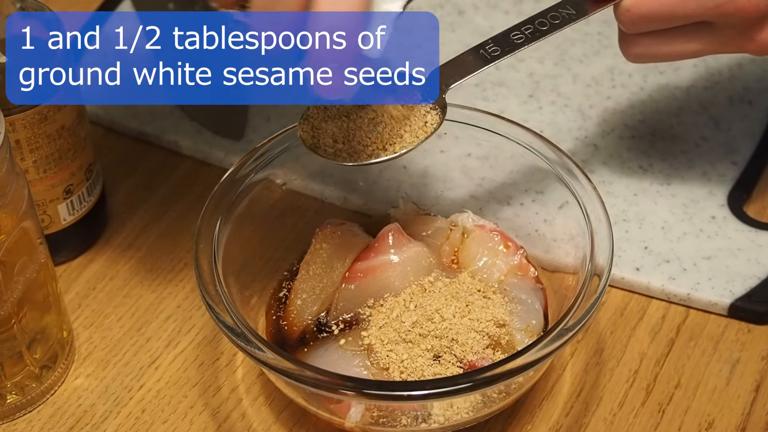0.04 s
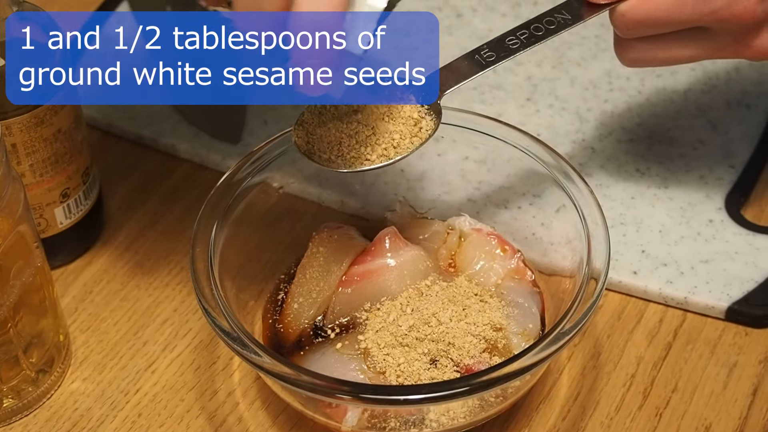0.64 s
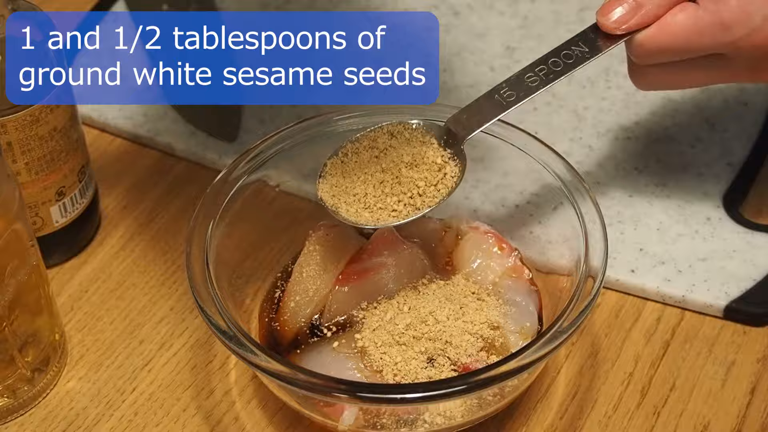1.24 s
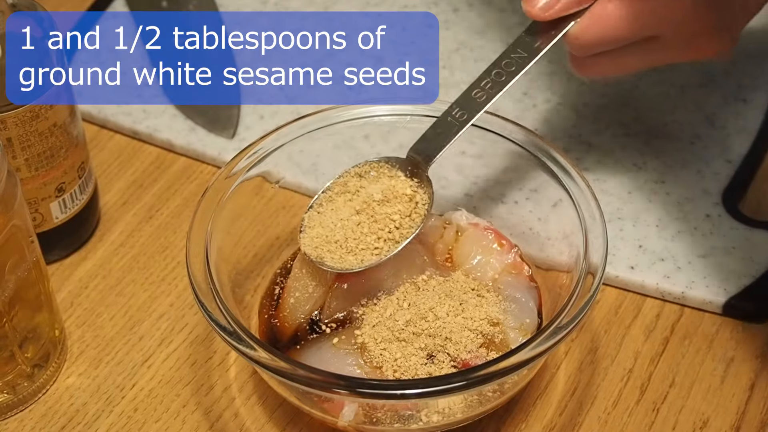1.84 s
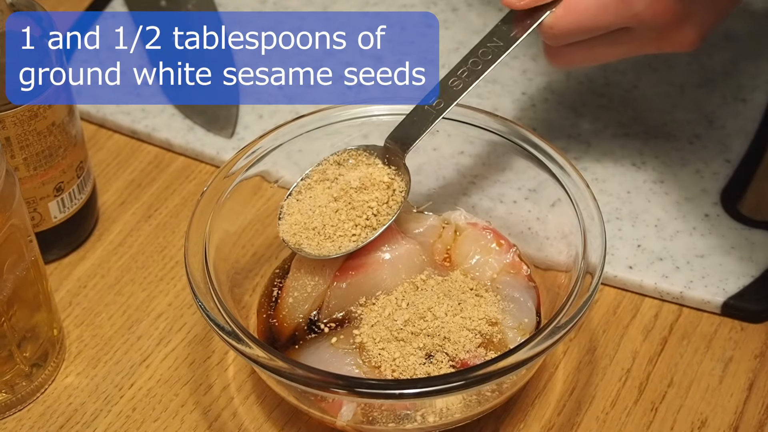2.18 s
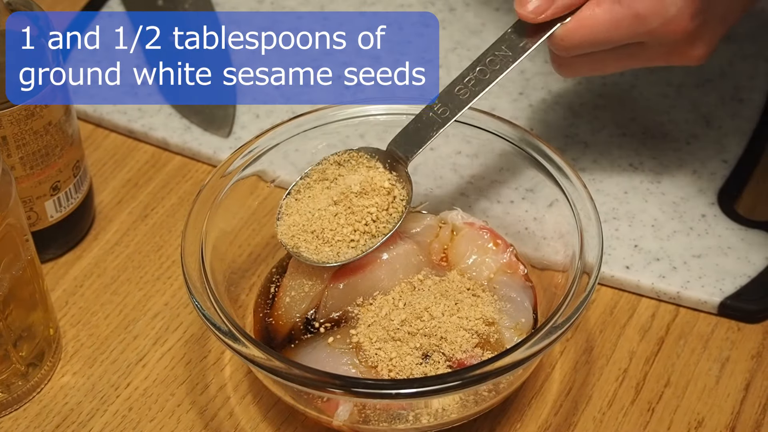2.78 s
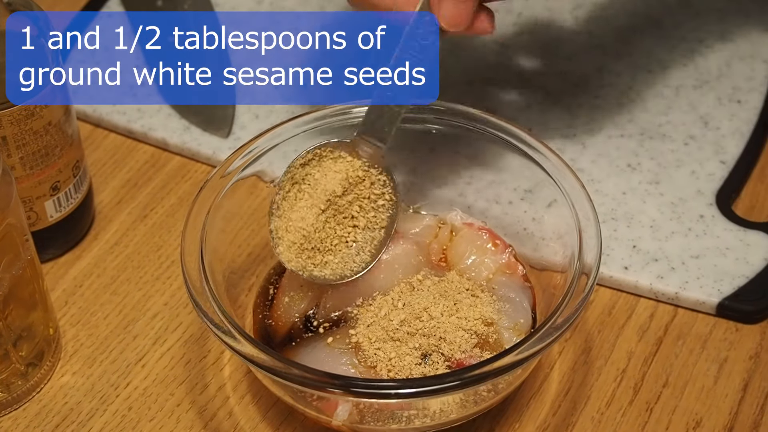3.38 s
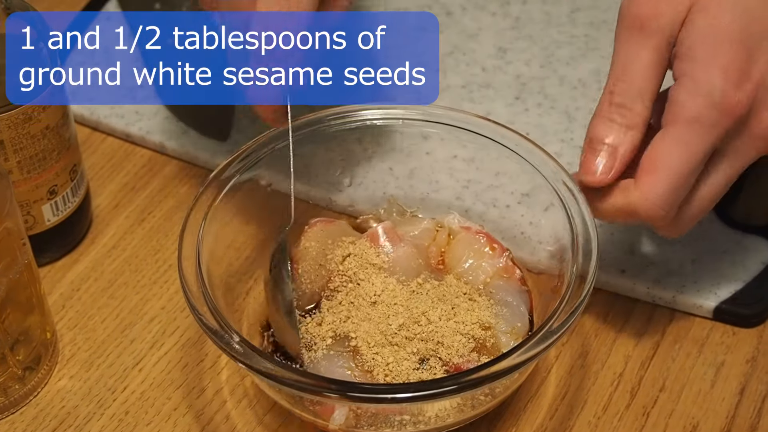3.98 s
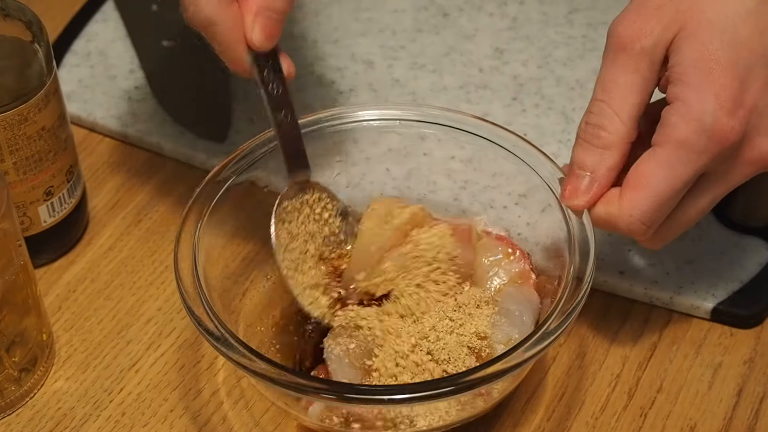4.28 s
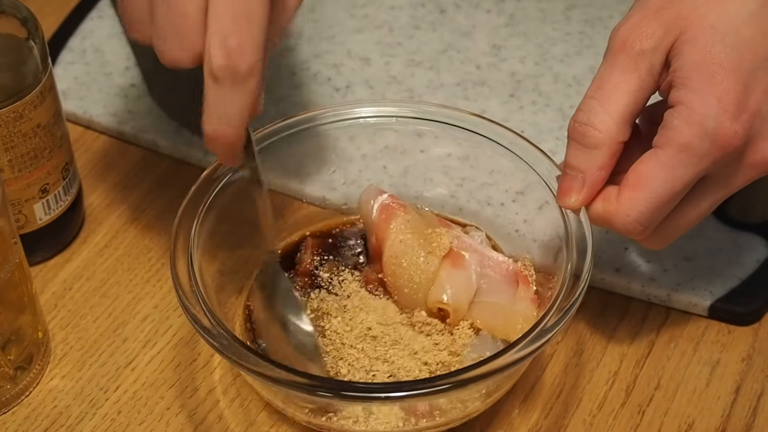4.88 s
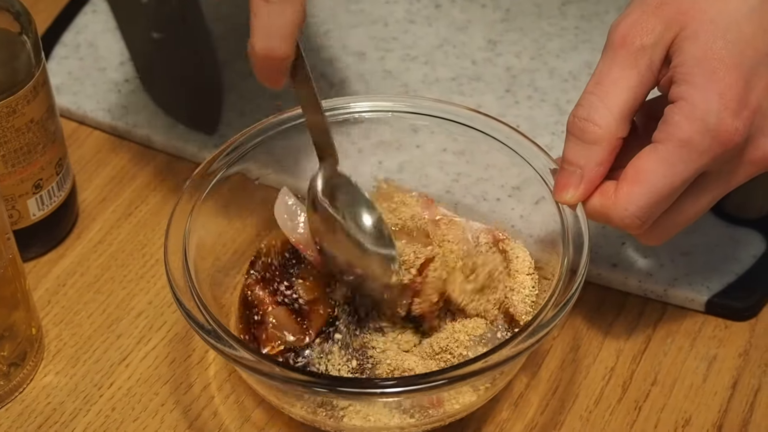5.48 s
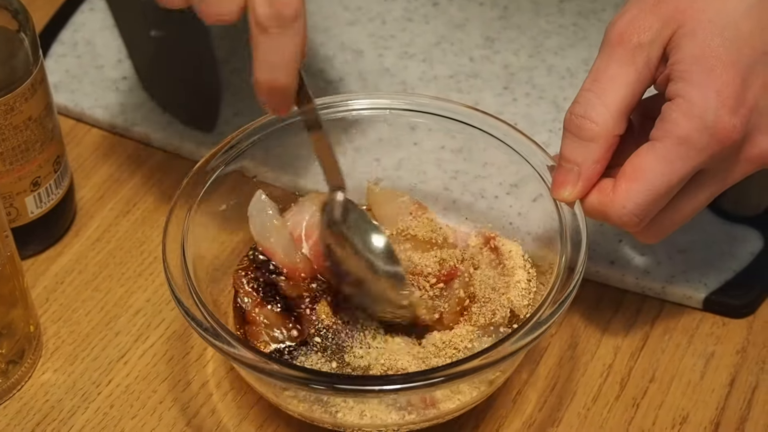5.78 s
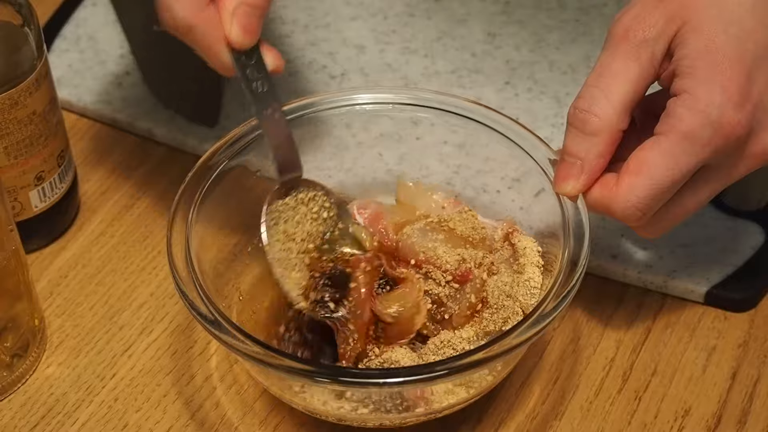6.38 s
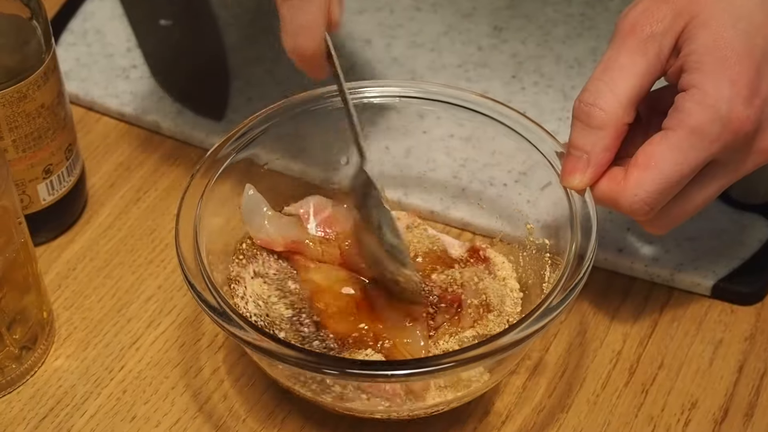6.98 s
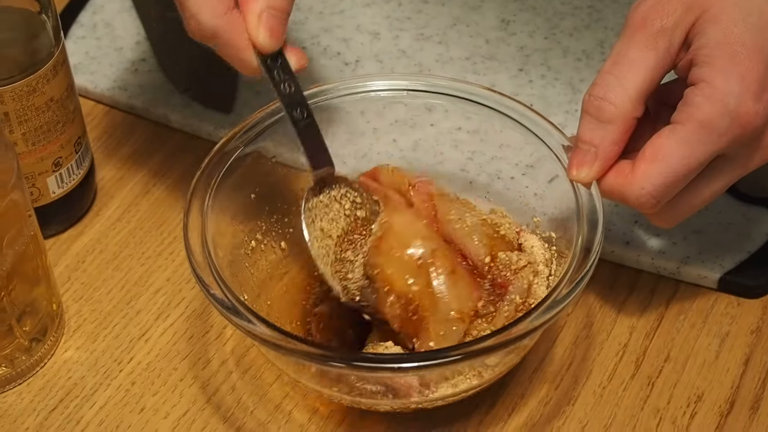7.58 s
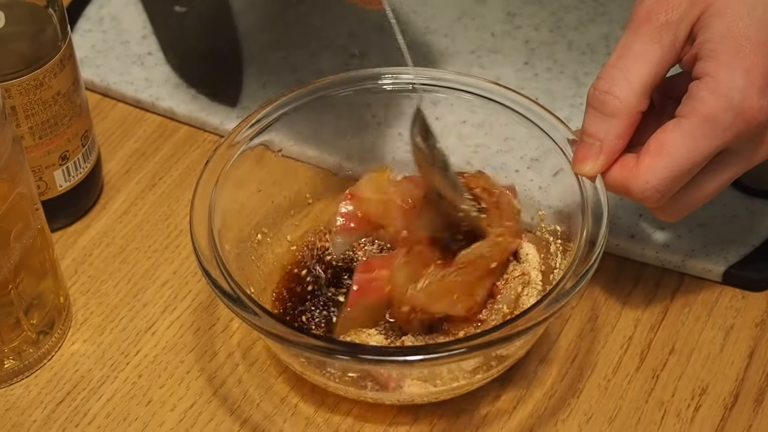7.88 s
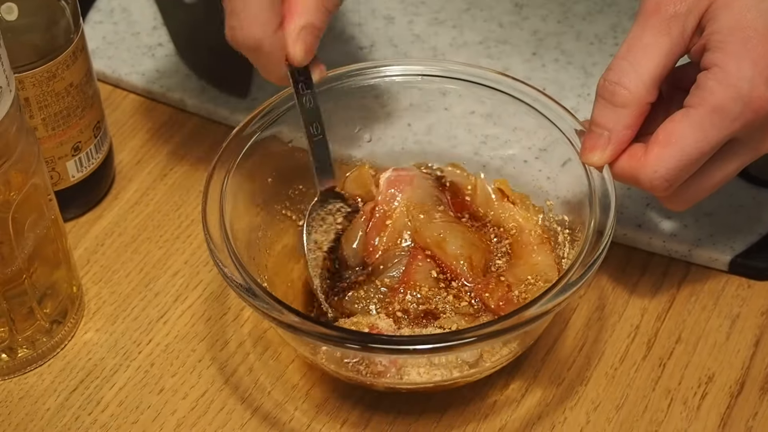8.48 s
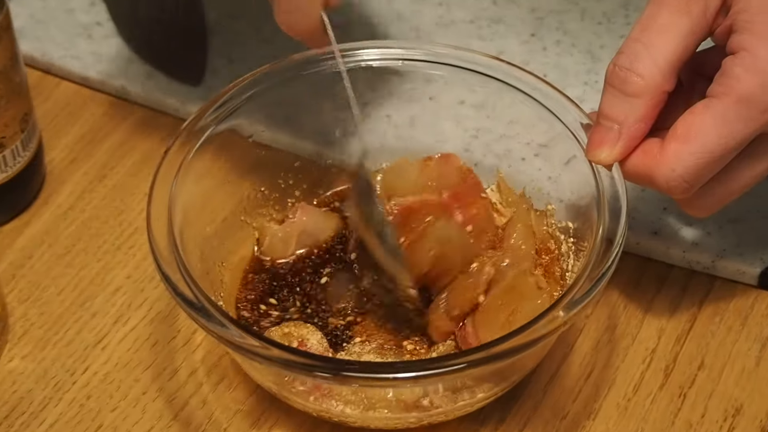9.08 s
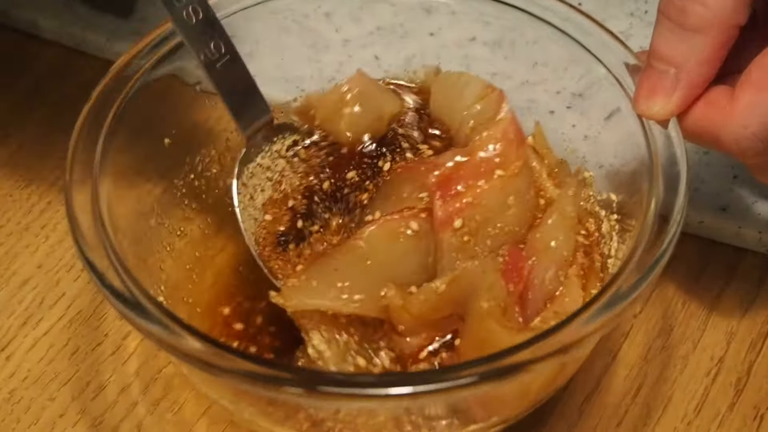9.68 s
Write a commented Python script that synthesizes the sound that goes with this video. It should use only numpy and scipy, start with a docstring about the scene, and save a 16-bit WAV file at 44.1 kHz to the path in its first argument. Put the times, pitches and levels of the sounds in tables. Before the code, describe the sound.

After a soft pour of seeds and a plastic rustle, a metal spoon stirs squelching meat, clinking on a glass bowl about once a second.

```python
"""A steel spoon clinks against a glass bowl about once a second as it stirs chicken in a wet marinade.
Each blow rings the glass and thumps the wooden counter; the meat squelches and tiny bubbles pop.
Before the stirring, ground sesame slides from a plastic packet onto the spoon, and the packet
crinkles and is put down to the right. A small kitchen hums quietly around it all."""
import sys
import numpy as np
from scipy import signal
from scipy.fft import rfft, irfft
from scipy.io import wavfile
from scipy.ndimage import uniform_filter1d

SR = 44100
rng = np.random.default_rng(int(sys.argv[2]) if len(sys.argv) > 2 else 0)


def wav_record(signal):
    """Record a signal, one row per channel, as 16-bit PCM in the file named by sys.argv[1]."""
    frames = np.transpose(np.atleast_2d(signal))
    bounded = np.clip(frames, -1, 1)
    # unit amplitude maps onto the largest positive 16-bit level
    quanta = np.round(bounded * 32767).astype(np.int16)
    wavfile.write(sys.argv[1], SR, quanta)


N = 429534
CUTOFF_HZ = 15800

# The spoon hits the bowl; a harder contact tilts the sound towards the treble. Each row: start in
# seconds, spot hit, ring level in dB, ring tilt in dB per octave, clack level in dB, clack tilt in dB
# per octave, thud level in dB. Levels in all tables are relative.
BLOWS = [(2.0606, "rim", -29.5, 2.5, -29, 5, -64), (2.0727, "rim", -37, 0.5, -42, 2, -54),
         (2.0825, "rim", -45, -4.5, -38, 5, -54), (3.8808, "wall", -16.5, -2, -15, 2.3, -52),
         (4.6187, "wall", -65.5, 4, -69, 19, -67), (4.8603, "wall", -65, 15, -70, 19, -51.5),
         (4.9319, "bottom", -36.5, 1.5, -25.5, 8, -51.5), (6.0032, "wall", -16, 1, -10.5, -0.5, -51),
         (7.1954, "wall", -17, -0.3, -12.5, -0.5, -62.5), (7.2784, "bottom", -40.5, 2.5, -26.5, 1.5, -54),
         (8.33, "wall", -15, 2, -12.5, -0.5, -57.5), (9.4359, "bottom", -54, -4, -23.5, 4.5, -49)]


def bowl_ring():
    """Each blow sets the glass bending and ringing, and thumps the counter twice through the bowl's foot."""
    # The glass, damped by the food: one list of close, beating tones for each way it bends.
    # Each row: pitch in Hz, level in dB, seconds to fade by 60 dB (called t60).
    bends = [
        [(1078, -12, .42), (1125, -1.5, .05), (1850, -2, .014)],
        [(2840, -15, .3), (2873, 2, .028)],
        [(5020, -7, .02), (5178, -3, .035), (5184, -23, .16), (5244, 3.5, .022), (5600, -2, .012)],
        [(7257, -16.5, .04), (8110, 1.5, .025), (8210, -17, .04)],
        [(11435, -1, .04), (12600, -7, .022), (12885, -8.5, .025)],
        [(15120, -2.5, .028)],
    ]
    # For each spot hit: how strongly it rings each of the six bends, in dB, lowest bend first.
    bend_db_at = {"rim": (1, -11.5, -5.5, -0.5, -18, -7), "wall": (-23, -14.5, 0, -1, -13, -24),
                  "bottom": (-11, 2, -7, -13, -13, -12)}
    # The counter's tones. Each row: pitch in Hz, level in dB, t60 in seconds.
    counter_tones = [(130, -3.5, 0.19), (180, 3, 0.076), (270, -3, 0.063), (480, -6.5, 0.059),
                     (813, -9, 0.064)]
    scatter_db = 1.5   # no two blows ring quite alike
    out = np.zeros((2, N))
    thud = struck(counter_tones, tilt_db=0, spread=.35)
    for start, spot, ring_db, tilt_db, _, _, thud_db in BLOWS:
        tones = [(hz, db + bend_db + scatter_db * rng.standard_normal(), t60)
                 for bend, bend_db in zip(bends, bend_db_at[spot]) for hz, db, t60 in bend]
        add(out, start, from_db(ring_db) * struck(tones, tilt_db, spread=.38))
        add(out, start, from_db(thud_db) * thud)
        add(out, start + 0.015, from_db(thud_db - 1.5) * thud)   # the bowl rocks back onto its foot
    return out * from_db([[.7], [-.7]])


def spoon_clack():
    """The held spoon gives a short clack; a gritty noise follows, lasting longer on rim and bottom hits."""
    # The steel, damped by the fingers. Each row: pitch in Hz, level in dB, t60 in seconds.
    steel_tones = [(1180, -13, 0.0072), (2223, -6.5, 0.0068), (2830, -7.5, 0.0015), (3590, -9.5, .008),
                   (4270, -6, .005), (5905, -1.5, 0.0026), (7315, -7, 0.0077), (8810, -5.5, 0.004),
                   (12300, -18.5, 0.0036), (13400, -13, 0.0072), (14200, -15, 0.0082)]
    # For each spot hit: the gritty noise's t60 in seconds.
    grit_t60_at = {"rim": 0.07, "wall": 0.01, "bottom": 0.079}
    # The gritty noise. Each row: frequency in Hz, level in dB.
    grit = [(200, -4.5), (1000, 4.0), (1600, -11), (3200, 3), (7000, -0.5), (10500, -10.5),
            (13500, -3.0), (16000, -8.5)]
    out = np.zeros((2, N))
    for start, spot, _, _, clack_db, tilt_db, _ in BLOWS:
        add(out, start, from_db(clack_db) * struck(steel_tones, tilt_db, spread=0.39))
        add(out, start, from_db(clack_db - 13) * burst(grit, grit_t60_at[spot]))
    return out


def pop(hz, cycles, rise, snap_db):
    """A wet film snaps and the small air pocket behind it rings, rising in pitch."""
    t = np.arange(SR // 30) / SR
    age = t * hz / cycles   # reaches 1 when the ring has faded by 60 dB
    tone = np.sin(2 * np.pi * hz * t * (1 + rise * np.minimum(age, 1)))
    loudness = from_db(-60 * age) * (1 - np.exp(-t * hz)) ** 3
    snap = rng.standard_normal(len(t)) * np.exp(-t / 0.00023)
    return tone * loudness + from_db(snap_db) * cut(snap, [min(.7 * hz, 10000), 1.4 * hz], "band")


def marinade():
    """A few clear smacks, each of two air pockets opening, over clusters of faint sticky crackles."""
    # The clearest bubbles. Each row: start in seconds, level in dB, pitch in Hz.
    bubbles = [(4.335, -42.5, 6950), (4.4169, -50, 2560), (4.4706, -33, 7630), (4.8908, -41, 7800),
               (5.5127, -43, 7000), (5.8002, -39, 6300), (6.346, -44.5, 6670), (6.3887, -48.5, 2260),
               (6.5075, -37, 4650), (6.521, -41.5, 7500), (6.8492, -40.5, 7500), (7.5442, -41.5, 13300),
               (7.6096, -40.5, 5850), (7.9333, -39, 3740), (7.9877, -42, 2420), (8.0162, -45.5, 3550),
               (8.7792, -49, 5460), (9.0153, -41, 7070), (9.212, -37.5, 3650), (9.2196, -38.5, 7000)]
    stir_start_s, stir_length_s, cluster_s = 4.0, 5.6, 0.078
    out = np.zeros(N)
    for start, db, hz in bubbles:
        add(out, start, from_db(db + 3) * pop(hz, cycles=24, rise=0.06, snap_db=-5))
        add(out, start + 0.0013, from_db(db - 9) * pop(0.55 * hz, cycles=13, rise=0.092, snap_db=-16))
    for when, pitch, size, *delays in rng.random((120, 6)):   # 120 clusters of three crackles
        start = stir_start_s + stir_length_s * when
        for delay in delays:
            hz = min(1800 * 7 ** pitch * (1 + 0.32 * delay), CUTOFF_HZ)
            db = -63.5 + 16.5 * size ** 2 - 8 * delay
            add(out, start + cluster_s * delay, from_db(db) * pop(hz, cycles=13, rise=.04, snap_db=-2.5))
    return place(out, pan_db=0.5, lag=0)


def squelch():
    """Countless tiny wet films tear while the meat is pushed round."""
    # The spoon's pushes. Each row: start in seconds, length in seconds, level in dB.
    pushes = [(4.25, 0.22, -88), (5.25, 0.26, -81.5), (6.35, 0.22, -85), (7.85, 0.23, -78.5),
              (8.75, 0.38, -73.5), (9.18, 0.48, -72.5)]
    # The wet noise. Each row: frequency in Hz, level in dB.
    wet_colour = [(700, -15.5), (2000, 2.5), (3700, -2.5), (7500, -1), (15000, -16.5)]
    tearing = colour(grainy(rng.standard_normal(N), rough_db=7), wet_colour)
    return place(strokes(pushes, swell=0.23, release_t60=0.26) * tearing, pan_db=1.5, lag=0)


def sesame_pour():
    """Ground seeds hiss out of the packet with every shake."""
    # The pour. Its one row: start in seconds, length in seconds, level in dB.
    pour = [(0.0, 0.71, -62.5)]
    # The sliding seeds. Each row: frequency in Hz, level in dB.
    seed_colour = [(880, -13), (1500, 1), (3030, -7), (3690, -1.5), (7460, -0.5), (10000, -5.5),
                   (13900, -5.5), (16000, -3)]
    first_shake_s, shake_period_s, shake_db = 0.14, 0.152, 2.5
    t = np.arange(N) / SR
    shake = from_db(shake_db * np.cos(2 * np.pi * (t - first_shake_s) / shake_period_s))
    sliding = colour(grainy(stereo_noise(0.51), rough_db=5.2), seed_colour)
    return shake * strokes(pour, swell=0.0067, release_t60=0.57) * sliding


def packet_crinkle():
    """The plastic rustles as the hand lifts it away, and snaps along its creases."""
    # The loudest creases. Each row: start in seconds, level in dB, pitch in Hz.
    creases = [(0.0275, -42, 7650), (0.317, -45.5, 2300), (0.361, -48, 7150), (1.4178, -25.5, 4010),
               (1.4299, -24.5, 2000), (1.4509, -26.5, 2030), (1.4925, -32, 3490), (1.5182, -30, 1740),
               (1.544, -31.5, 3300), (1.5971, -32, 2550), (1.714, -38.5, 13400), (1.8224, -43, 10600)]
    # The hand flexes the packet. Each row: start in seconds, length in seconds, level in dB.
    flexes = [(1.26, .15, -55.5), (1.405, .03, -53), (1.512, 0.046, -40), (1.56, 0.043, -46.5),
              (1.61, 0.078, -55.5), (1.75, 0.22, -62)]
    # The rustling plastic. Each row: frequency in Hz, level in dB.
    rustle_colour = [(530, -33), (900, -13), (1310, -11.5), (2020, -8), (3000, -7), (3910, -6),
                     (7680, -6.5), (10000, -15), (14000, -8), (16000, -15)]
    snaps = np.zeros(N)
    for start, db, hz in creases:
        snap_colour = [(600, -24), (min(hz, 2000) * 0.62, -6), (hz, 0), (hz * 2, -8), (30000, -14)]
        add(snaps, start, from_db(db - 9.5) * burst(snap_colour, t60=0.06))
    grains = colour(grainy(stereo_noise(0.51), rough_db=5.2), rustle_colour)
    rustle = from_db(-2.5) * strokes(flexes, swell=0.4, release_t60=0.046) * grains
    return place(snaps, pan_db=-0.8, lag=1) + rustle


def packet_put_down():
    """The soft packet lands, drags over the counter and settles."""
    # The knocks. Each row: start in seconds, level in dB, low and high filter edges in Hz.
    knocks = [(2.251, -40.5, 1230, 4050), (2.2674, -28.5, 600, 18000), (2.511, -42, 3060, 15000),
              (2.718, -44, 700, 4000), (2.75, -46, 900, 13000), (2.758, -30, 200, 2600),
              (2.837, -43.5, 700, 3880), (3.347, -31.5, 350, 7600)]
    # The drags. Each row: start in seconds, length in seconds, level in dB.
    drags = [(2.3, 0.07, -53.5), (2.4, 0.079, -52.5), (2.65, 0.3, -62)]
    # Plastic touching wood. Each row: frequency in Hz, level in dB.
    contact_colour = [(200, -26), (500, -3), (1500, 4), (2500, -3.5), (3900, 1.5), (5200, -5), (8000, -6),
                      (11000, -16.5), (15500, -5.5)]
    rubbing = cut(colour(rng.standard_normal(N), contact_colour), 16000, "low", order=1)
    out = from_db(-6) * strokes(drags, swell=0.083, release_t60=0.2) * rubbing
    for start, db, low_hz, high_hz in knocks:
        knock = cut(burst(contact_colour, t60=0.033), [low_hz, high_hz], "band")
        add(out, start, from_db(db - 2.5) * knock)
    return place(out, pan_db=-1.0, lag=4)


def kitchen(x, wet_db, early_db):
    """Add echoes: strong early ones off the counter and tiles, then a tail whose treble dies sooner."""
    # How long the room rings. Each row: frequency in Hz, t60 in seconds.
    room_t60 = [(150, 0.34), (800, 0.57), (2500, 0.37), (5500, 0.28), (9000, 0.22), (15000, .2)]
    t = np.arange(SR // 2) / SR
    edges = np.geomspace(70, 18000, 11)
    tail = 0
    for low, high in zip(edges, edges[1:]):
        band = cut(rng.standard_normal((2, len(t))), [low, high], "band")
        tail = tail + band * from_db(-60 * t / at_hz(room_t60, np.sqrt(low * high)))
    fade_in = np.clip(t / 0.0013 - .5, 0, 1)
    early_boost = 1 + from_db(early_db) * np.exp(-t / 0.024)
    response = rfft(tail * fade_in * early_boost)
    # well-mixed echoes carry about the same power at every pitch
    power = uniform_filter1d(np.abs(response) ** 2, size=60)
    echoes = irfft(response / np.sqrt(power + 1e-9))[:, :SR * 2 // 5]
    return x + from_db(wet_db) * signal.fftconvolve(x, echoes, axes=1)[:, :N]


def hum_and_hiss():
    """The kitchen's steady low hum, with a faint hiss above it."""
    # The hum and the hiss. Each row: frequency in Hz, level in dB.
    hum_colour = [(13, -31.5), (22, -1.5), (32, -3), (50, -8), (86, 0.5), (200, -2), (248, -14), (291, -8),
                  (400, -10), (517, -4.5), (555, -9.5), (795, -9.5), (1020, -7.5), (1600, -24.5),
                  (2080, -45), (3520, -120)]
    hiss_colour = [(940, -26), (1600, -3), (2400, -5.5), (2590, -12), (2800, -3), (3020, -11), (3200, -4.5),
                   (4530, -8.5), (6470, -13.5), (7550, -9.5), (10200, -16.5), (12500, -11.5), (13800, -3),
                   (16000, -12.5)]
    hum = from_db(-62.5) * colour(stereo_noise(0.16), hum_colour)
    hiss = from_db(-67) * colour(stereo_noise(0.25), hiss_colour)
    return hum + hiss


def struck(tones, tilt_db, spread):
    """A struck object rings in fading tones; spread shifts them apart between left and right."""
    t = np.arange(SR // 2) / SR
    out = np.zeros((2, len(t)))
    for k, (hz, db, t60) in enumerate(tones):
        phase = spread * (-1) ** (k // 2) * np.array([[1], [-1]])
        loudness = from_db(db + tilt_db * np.log2(hz / 5000) - 60 * t / t60)
        out += (-1) ** k * loudness * np.sin(2 * np.pi * hz * t + phase)
    return out


def burst(spectrum, t60):
    """A short crunch of many tiny contacts."""
    t = np.arange(SR // 8) / SR
    return colour(rng.standard_normal(len(t)), spectrum) * from_db(-60 * t / t60)


def strokes(rows, swell, release_t60):
    """Loudness over time: each movement swells over a share of its length, holds and dies away."""
    t = np.arange(N) / SR
    loudness = np.zeros(N)
    for start, length, db in rows:
        rise = np.clip((t - start) / (swell * length), 0, 1)
        loudness += rise * from_db(db - 60 * np.maximum(t - start - length, 0) / release_t60)
    return loudness


def grainy(noise, rough_db):
    """Boost each sample at random, so that a few stick out as grains."""
    return noise * from_db(rough_db * np.minimum(rng.exponential(1, N), 5))


def stereo_noise(alike):
    """White noise for left and right, from unrelated (0) to identical (1)."""
    mid, side = rng.standard_normal((2, N))
    return np.sqrt(1 + alike) * mid + np.sqrt(1 - alike) * side * [[1], [-1]]


def colour(x, spectrum):
    """Give a noise its balance of low and high, then scale it to a power of 1."""
    gains = from_db(at_hz(spectrum, np.fft.rfftfreq(x.shape[-1], 1 / SR)))
    shaped = irfft(rfft(x) * gains, x.shape[-1])
    return shaped / np.sqrt(np.mean(shaped ** 2) + 1e-20)


def at_hz(points, hz):
    """Read between a table's rows, with octaves evenly spaced."""
    frequencies, values = np.transpose(points)
    return np.interp(np.log(hz + 1e-9), np.log(frequencies), values)


def cut(x, hz, kind, order=2):
    """Keep only the lows, the highs or a band."""
    return signal.sosfilt(signal.butter(order, np.clip(hz, 10, .45 * SR), kind, fs=SR, output="sos"), x)


def from_db(db):
    """Turn decibels into a multiplier."""
    return 10 ** (np.asarray(db) / 20)


def add(track, start, sound):
    """Mix a sound in at a time in seconds."""
    at = int(np.clip(round(start * SR), 0, N))
    track[..., at:at + sound.shape[-1]] += sound[..., :N - at]


def place(x, pan_db, lag):
    """A sound on the right (pan_db below 0) reaches the left side more softly and lag samples later."""
    n = np.arange(N)
    return np.array([np.interp(n - lag, n, x), x]) * from_db([[pan_db / 2], [-pan_db / 2]])


def scene():
    """Near and far sounds in the kitchen, over its hum."""
    ring = kitchen(bowl_ring(), wet_db=-6, early_db=-4)
    clack = kitchen(spoon_clack(), wet_db=-11.5, early_db=-7.5)
    stirring = from_db(2) * kitchen(marinade() + squelch(), wet_db=-7.5, early_db=6.5)
    pouring = kitchen(sesame_pour() + packet_crinkle(), wet_db=-6.5, early_db=-8)
    put_down = kitchen(packet_put_down(), wet_db=-0.5, early_db=12.5)   # farther away, so more echo
    return ring + clack + stirring + pouring + put_down + hum_and_hiss()


def record(dry):
    """Round off the loudest peaks and cut the highest treble."""
    ceiling = .4
    rounded = ceiling * np.tanh(dry / ceiling)
    return signal.sosfilt(signal.ellip(10, .1, 80, CUTOFF_HZ, fs=SR, output="sos"), rounded)


dry = scene()
out = record(dry)
wav_record(out)
```